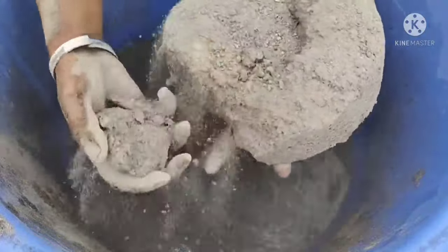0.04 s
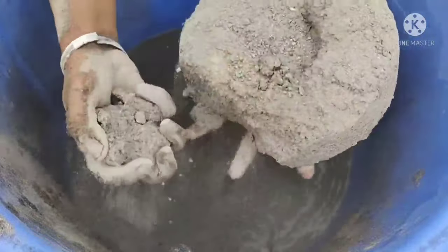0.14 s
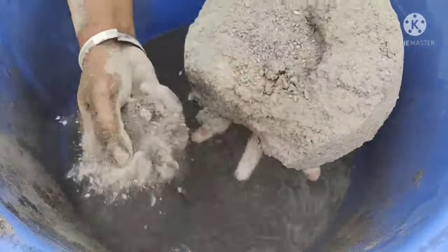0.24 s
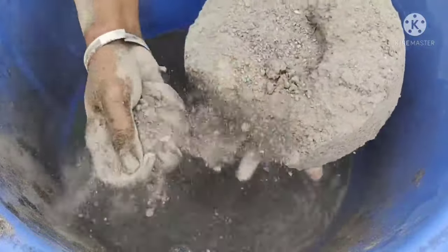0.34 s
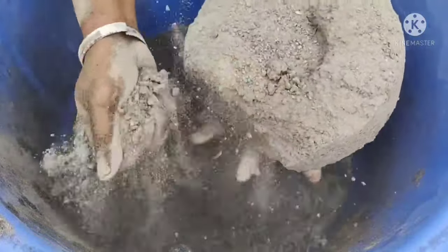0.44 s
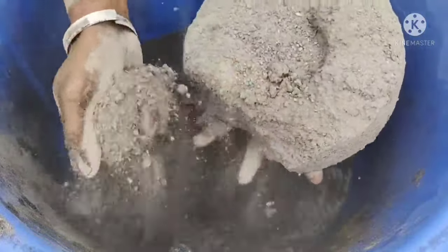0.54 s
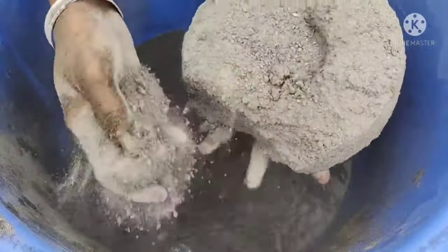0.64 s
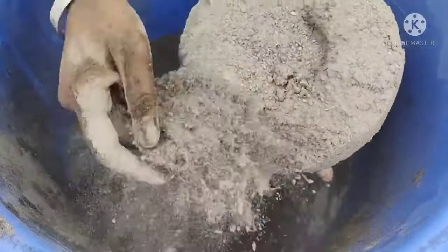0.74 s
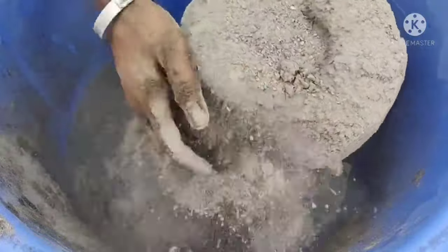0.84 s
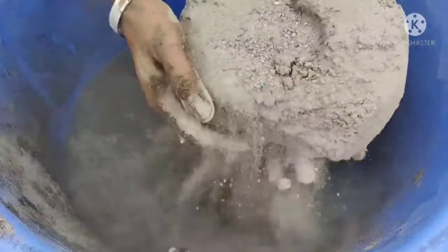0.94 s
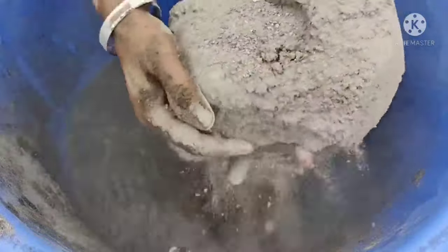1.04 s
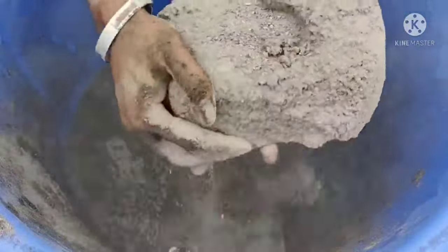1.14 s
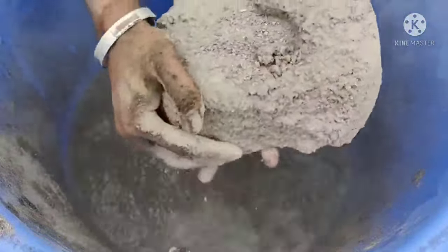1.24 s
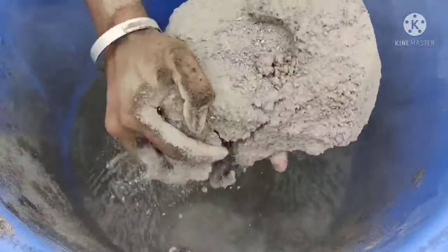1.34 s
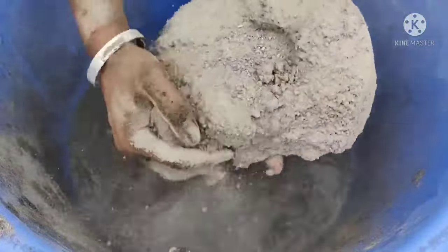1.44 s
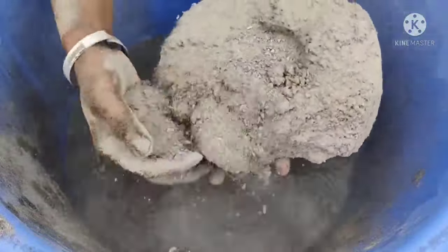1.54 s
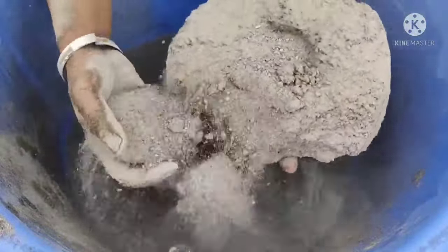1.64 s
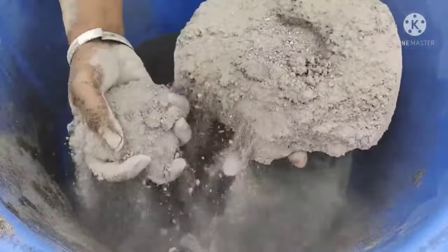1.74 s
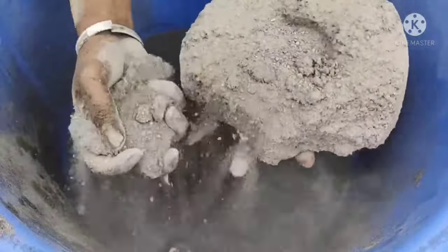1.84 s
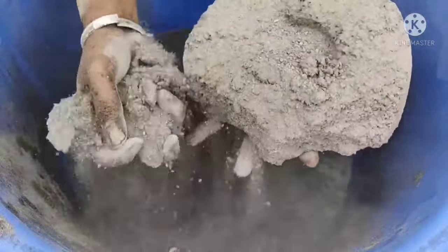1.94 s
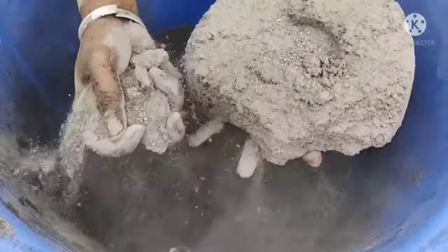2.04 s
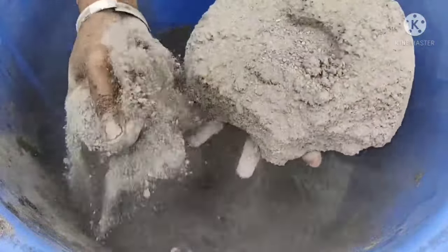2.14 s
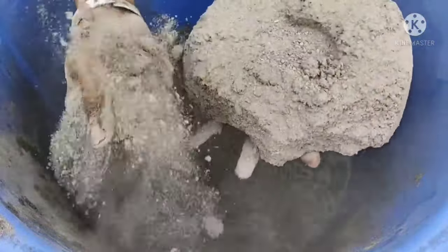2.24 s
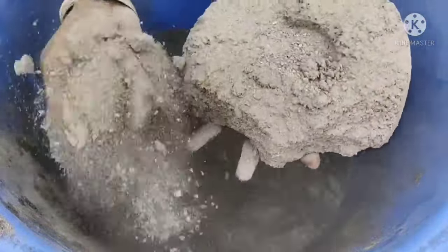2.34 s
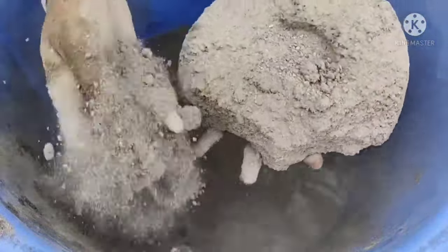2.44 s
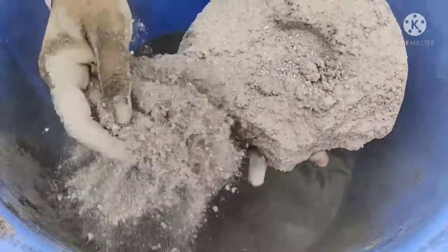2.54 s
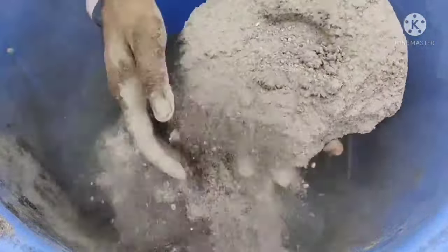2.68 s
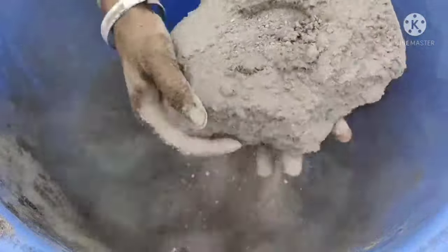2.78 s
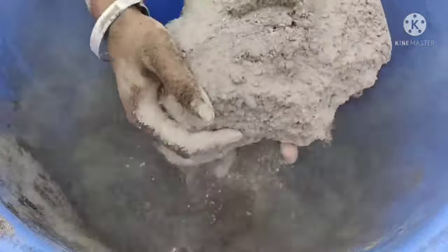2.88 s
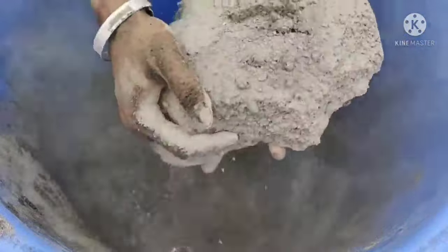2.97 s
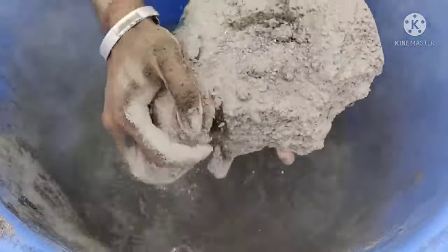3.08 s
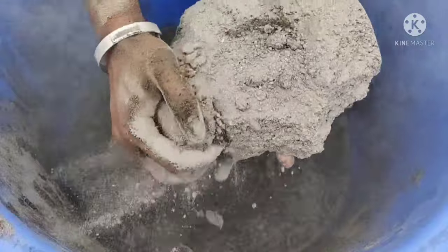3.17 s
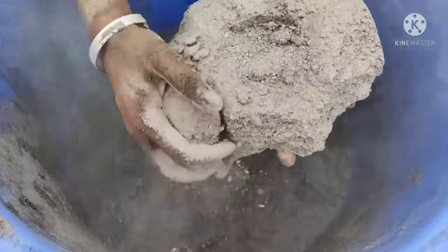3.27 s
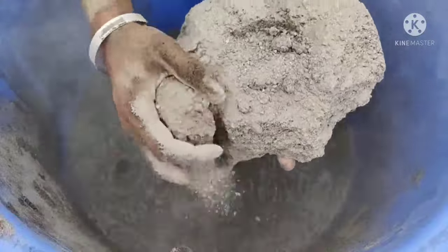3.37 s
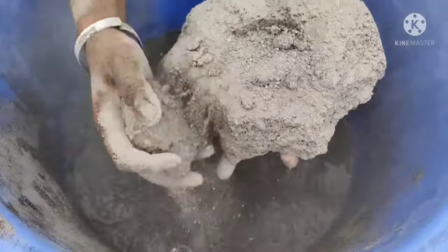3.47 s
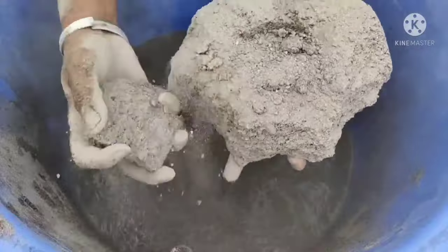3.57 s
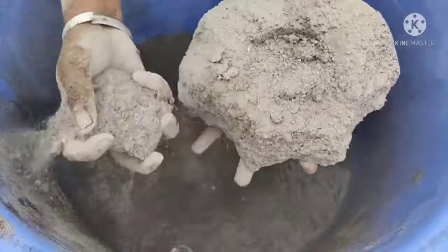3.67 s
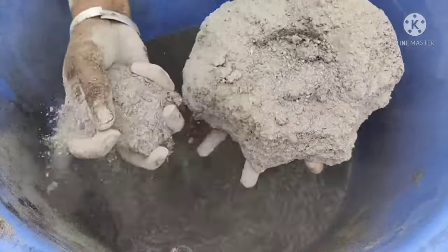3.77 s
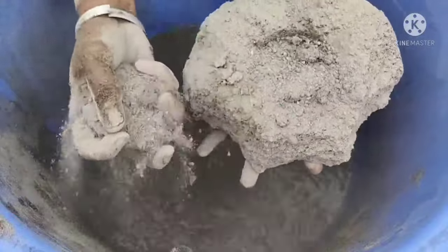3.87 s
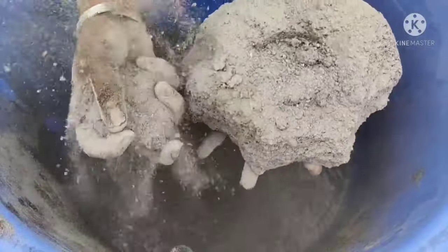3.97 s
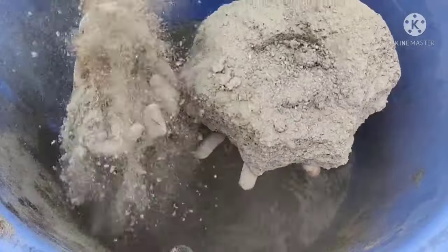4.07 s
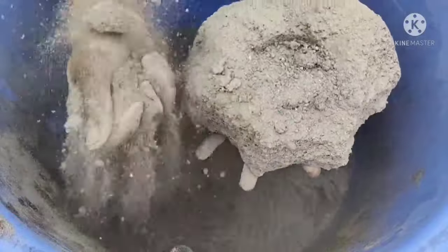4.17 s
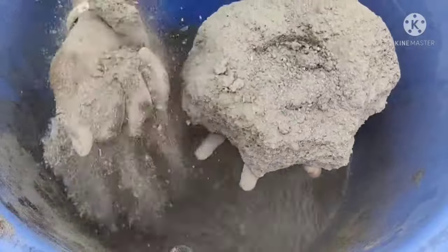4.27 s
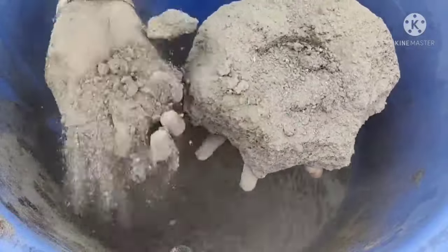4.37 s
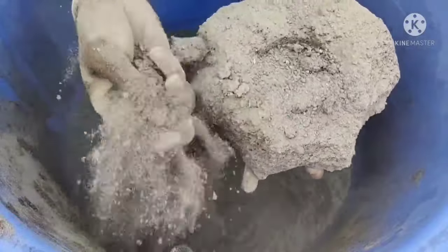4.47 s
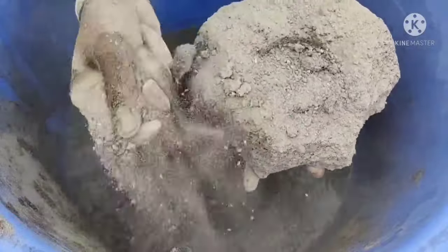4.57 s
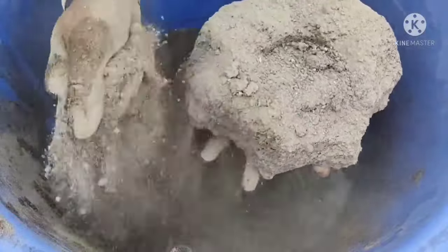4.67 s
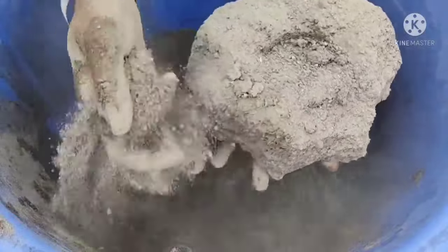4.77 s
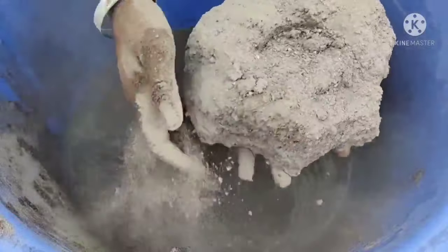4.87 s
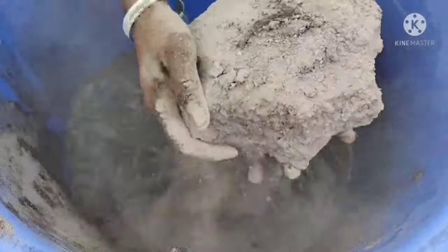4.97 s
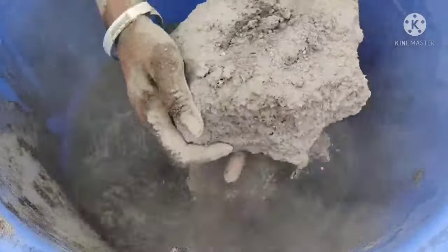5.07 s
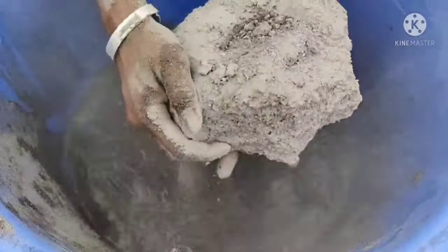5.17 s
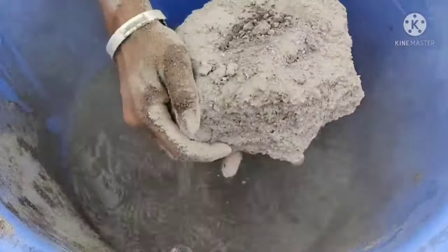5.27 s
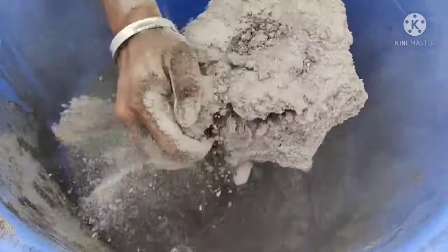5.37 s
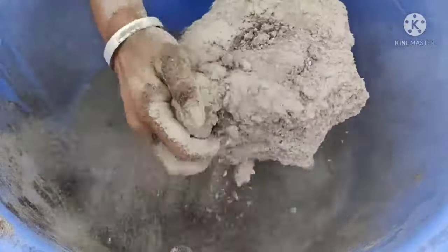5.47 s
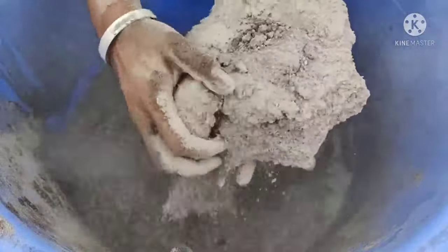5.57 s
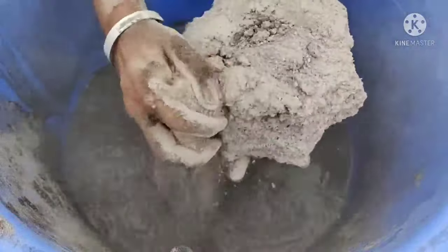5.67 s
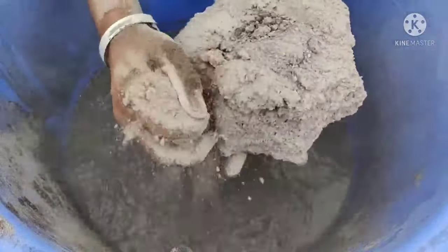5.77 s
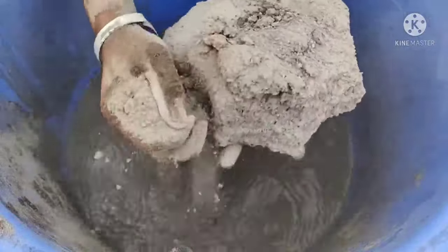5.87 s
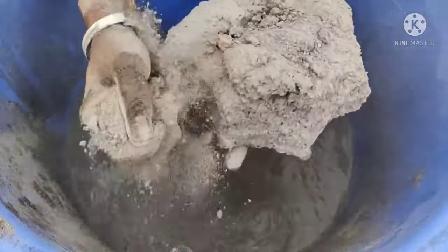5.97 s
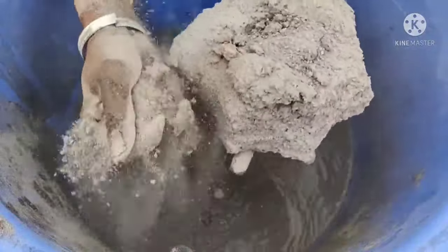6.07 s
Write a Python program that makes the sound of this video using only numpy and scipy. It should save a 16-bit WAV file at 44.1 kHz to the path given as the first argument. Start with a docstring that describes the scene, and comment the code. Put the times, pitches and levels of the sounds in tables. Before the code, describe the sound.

A hand crumbles a dry sand-cement block over a tub of water, gritty crunches and sharp cracks followed by fizzing, pattering crumbs and plopping lumps.

```python
"""Outdoors, close over a plastic tub of water, a hand crumbles a block of sand and cement.
Grit hisses and cracks: random impulses and noise bursts are filtered, and small resonators ring.
Crumbs fizz and patter as swarms of rising bubble tones; some single bubbles ping.
Larger lumps slap the surface, open ringing cavities and excite the damped modes of the tub.
A low rumble and buffeting air lie behind, as filtered noise."""
import sys
import numpy as np
from scipy import signal
from scipy.fft import rfft, irfft
from scipy.io import wavfile

SR = 44100
rng = np.random.default_rng(int(sys.argv[2]) if len(sys.argv) > 2 else 0)


def store_pcm(level_fs):
    """Save levels as 16-bit WAV."""
    pcm = np.round(np.clip(level_fs, -1, 1) * 32767).astype(np.int16)
    wavfile.write(sys.argv[1], SR, np.atleast_2d(pcm).T)


N = 269892  # length in samples

# Event levels are relative: each layer applies its own gain afterwards.
# Background air spectrum. Each row: frequency in Hz, relative level in dB.
AIR_SPECTRUM = [(20, -38), (50, -3), (70, -5), (105, -3), (150, -3), (220, 1.5), (290, -4), (400, -16),
                (700, -14), (2000, -48), (8000, -42)]
# Buffeting air spectrum. Each row: frequency in Hz, relative level in dB.
BUFFET_SPECTRUM = [(10, -30), (22, -12.0), (33, 11.5), (50, -6.5), (80, -27), (200, -9), (1000, -69)]
# Puffs of air at the microphone. Each row: start in seconds, hold in seconds, level in dB.
AIR_PUFFS = [(.7, 0.13, -36), (1.93, 0.093, -35.5), (2.24, 0.055, -44), (2.47, .08, -37), (5.35, .08, -35)]
# Spectrum of sand under the fingers. Each row: frequency in Hz, relative level in dB.
RUB_SPECTRUM = [(2000, -26), (4500, -15), (7200, 0), (10000, -15), (15000, -28)]
# Fingers shear sand off the block. Each row: start in seconds, hold in seconds, level in dB.
SQUEEZES = [(0.0, 0.024, -30), (.125, 0.034, -42), (.31, 0.045, -42.5), (.437, 0.0095, -27),
            (.495, 0.17, -37.5), (.65, 0.081, -39), (.92, 0.024, -34), (1.15, 0.069, -35),
            (1.3, 0.03, -38.5), (1.403, 0.012, -47), (1.517, 0.022, -33.5), (1.61, 0.097, -43.5),
            (1.8, 0.072, -37.5), (1.9, .04, -44), (2.04, 0.045, -41), (2.325, 0.055, -31.5),
            (2.48, 0.037, -34.5), (2.77, .12, -30.5), (2.97, .03, -33), (3.297, 0.037, -29.5),
            (3.44, 0.017, -34), (3.76, 0.16, -40), (3.93, 0.083, -37), (4.225, 0.011, -27),
            (4.345, 0.12, -37), (4.64, 0.14, -40), (4.76, .11, -34.5), (4.93, 0.2, -43),
            (5.135, 0.011, -32), (5.46, 0.01, -41), (5.537, 0.028, -28.5), (5.88, .055, -35.5),
            (5.96, 0.067, -43), (6.063, 0.025, -30.5)]
# Showers of crumbs on the water. Each row: start in seconds, hold in seconds, level of the fine crumbs
# in dB, level of the coarse crumbs over the fine ones in dB.
SHOWERS = [(0.0, 0.052, -31, 0), (0.089, 0.048, -34, 3), (0.238, 0.014, -35, 2.5),
           (0.296, 0.085, -37, -2.5), (0.432, 0.2, -42.5, 5.5), (0.663, 0.1, -34, -2),
           (0.801, 0.07, -32.5, -10), (0.905, 0.057, -32, 3), (0.989, .21, -31.5, -1.5),
           (1.223, 0.027, -40, 1.5), (1.39, 0.021, -42, 6), (1.52, 0.045, -43, 5), (1.609, 0.11, -38, 3),
           (1.883, 0.058, -30.5, -1.5), (1.968, 0.0098, -28.5, 10), (2.047, 0.024, -36.5, 4.5),
           (2.129, 0.03, -36, 4.5), (2.244, 0.033, -35, 8), (2.313, 0.16, -34, 0), (2.521, 0.054, -35, 6),
           (2.604, 0.052, -36, 7), (2.711, 0.045, -34, 3.5), (2.782, 0.22, -31, -1),
           (3.055, 0.048, -39, -1), (3.383, 0.073, -41, 2.5), (3.469, 0.021, -31.5, -6),
           (3.516, 0.19, -39.5, -10.5), (3.732, 0.027, -38, 0), (3.901, 0.043, -34.5, 1),
           (3.997, 0.067, -43.5, -1), (4.091, 0.018, -34.5, -1.5), (4.187, 0.098, -36, 0),
           (4.324, .17, -32, 1.5), (4.537, 0.047, -33.5, -1.5), (4.598, .025, -36, -7),
           (4.711, 0.038, -36.5, 3), (4.744, 0.06, -35.5, 6), (4.83, 0.217, -36, 0.5),
           (5.113, 0.06, -31, -4.5), (5.166, 0.13, -38.5, -1), (5.642, 0.033, -30.5, 4.5),
           (5.706, 0.086, -32.5, -7.5), (5.845, 0.082, -35, -1.5)]
# Spectrum of loose sand. Each row: frequency in Hz, relative level in dB.
SAND_SPECTRUM = [(300, -25), (1200, -3.5), (2500, -2), (4000, -11), (5200, -9), (6300, -1.5), (7200, 1.5),
                 (8300, -3), (10000, -14.5), (12500, -33.5), (15500, -27)]
# Spectrum of brittle fracture. Each row: frequency in Hz, relative level in dB.
CRACK_SPECTRUM = [(200, 5.5), (1000, 4), (3000, -4), (5000, 2.5), (7200, 10.5), (9000, -3.5),
                  (12000, -22.5), (15500, -29)]
# Spectrum of small splashes. Each row: frequency in Hz, relative level in dB.
SPLASH_SPECTRUM = [(40, -5), (150, 3.5), (270, 0.5), (500, -0.5), (650, 0), (920, 3.5), (1800, -20.5),
                   (4000, -9), (10000, -36)]
# Clearest single bubbles. Each row: start in seconds, level in dB, initial pitch in Hz.
BUBBLES = [(0.051, -23, 1360), (0.059, -24, 2360), (0.442, -24, 2660), (1.071, -23, 2340),
           (1.092, -19, 2800), (1.095, -20, 1960), (1.403, -24, 2060), (1.701, -21.5, 2380),
           (2.081, -18.5, 1725), (2.385, -21, 1620), (2.625, -18.5, 2360), (3.529, -27, 1800),
           (3.606, -22, 2010), (3.852, -22, 2110), (3.928, -21, 1970), (4.01, -22.5, 2140),
           (4.203, -20.5, 1830), (4.477, -31, 2100), (5.004, -19.5, 1590), (5.035, -17, 1990),
           (5.733, -24, 1450), (5.756, -18.5, 2680)]
# Sunken lumps landing on the bottom. Each row: start in seconds, level in dB.
THUDS = [(0.116, -18.5), (0.747, -32), (0.949, -32), (1.36, -22), (1.977, -14), (2.286, -8.5), (2.564, -36),
         (2.792, -27), (3.097, -18.5), (3.152, -23.5), (4.443, -20), (4.569, -22), (5.303, -21),
         (5.396, -18.5)]
# Modes of the tub with its water. Each row: frequency in Hz, relative level in dB, t60 in seconds.
TUB_MODES = [(105.7, -14.5, 0.36), (134.6, -10, 0.085), (180, -7, 0.077), (262, -3, 0.083),
             (316, -8, 0.047), (361, 2, 0.069), (450, 0.5, 0.024), (579, -4.5, 0.054), (753, -8.5, 0.052),
             (910, -2, 0.072), (1270, -12.5, 0.055), (1840, -3, 0.055)]
# Brittle cracks, strong and faint. Each row: start in seconds, level in dB, frequency in Hz of the short
# ring added to the crack.
SNAPS = [(0.0865, -10.5, 6400), (0.145, -2, 6440), (0.2611, -6, 7460), (0.266, -13, 7200),
         (0.5374, -15, 6660), (0.662, -10.5, 6500), (0.7107, -9.5, 6826), (0.7305, -10, 6400),
         (0.7436, 1, 6720), (0.8195, -14, 6169), (0.8528, -6.5, 6400), (0.8731, -9, 6470),
         (0.9617, -17, 6900), (1.1196, -10.5, 6330), (1.24, -15, 7700), (1.3454, -16, 7000),
         (1.7477, -10, 6940), (1.8, -17, 7100), (1.817, -16, 6000), (1.93, -7, 7760), (1.9324, -10.5, 3040),
         (1.9757, -4, 6550), (1.982, -3, 3350), (2.023, -9.5, 6800), (2.2793, -29, 3000),
         (2.4439, -6.5, 7230), (2.567, -3.5, 7360), (2.568, -17, 12400), (2.8197, -3.5, 6750),
         (2.821, -18, 13800), (3.0503, -8, 5500), (3.4789, -16.5, 8100), (3.553, -19, 12600),
         (3.6742, -15.5, 7100), (3.9015, -11, 2930), (4.0477, -13.5, 7740), (4.1044, -9.5, 7400),
         (4.345, -1.5, 6000), (4.3889, -5, 4900), (4.4384, -5, 8100), (4.4402, -13, 12300),
         (4.6086, -9.5, 6500), (5.0572, -10, 6850), (5.3016, -10, 7200), (5.6604, -8.5, 7550),
         (5.6737, -26, 3000), (5.9376, -12, 6200)]
# Lumps hitting the water. Each row: start in seconds, level of the cavity's ring in dB, its initial pitch
# in Hz, level of the knock on the tub in dB, level of the wet slap in dB.
LUMPS = [(0.106, -22.5, 634, -24, -15), (0.183, -18, 930, -19, -14.5), (0.26, -1.5, 827, -11.5, -5.5),
         (0.268, -8.5, 930, -16, -27), (0.355, -21, 850, -18, -36), (0.392, -14, 1015, -20, -33),
         (0.519, -19.5, 920, -42, -34), (0.687, -13.5, 987, -44, -34), (0.734, -19, 1040, -12.5, -18),
         (0.745, -32, 770, -9.5, -17), (0.817, -14.5, 865, -28.4, -20), (0.852, -13.5, 1040, -12.5, -12),
         (0.941, -27, 1110, -11.5, -9), (0.949, -34, 910, -16, -29), (0.97, -19, 970, -30, -30),
         (1.144, -18, 965, -40, -24), (1.154, -11.5, 917, -20, -28), (1.345, -13.5, 965, -12, -20),
         (1.747, -9.5, 850, -13, -9.5), (1.798, -20.5, 1530, -26, -15.5), (1.913, -14, 905, -20, -18),
         (1.974, -6, 905, -6, -7), (1.982, -24, 764, -10.5, -15), (1.985, -2.5, 784, -8.5, -17),
         (1.992, -26, 870, -11, -9), (2.002, -8, 840, -14, -35), (2.014, -4.5, 965, -13, -13),
         (2.023, -3, 840, -10.5, -10), (2.103, -16.5, 960, -23.5, -17), (2.258, -10, 610, -33, -3),
         (2.261, -10.5, 1070, -7.5, -11), (2.282, -0.3, 937, -7, -2.5), (2.446, -4, 918, -39, -6.5),
         (2.463, -9, 870, -19.5, -17.5), (2.567, -17, 573, -20.5, -27), (2.64, -13.5, 936, -27, -17),
         (2.695, -12.5, 936, -19.5, -31), (2.756, -13, 1010, -32, -12), (2.836, -17.5, 840, -31, -34),
         (2.913, -24, 1270, -23, -15), (3.003, -19, 1310, -23.5, -28), (3.174, -20.5, 1530, -29.5, -19),
         (3.495, -17, 1390, -30, -15), (3.903, -9, 970, -23.5, -8), (3.918, -13.5, 1120, -40, -24),
         (4.338, -11.5, 840, -35, -17), (4.428, -24, 1180, -17.5, -18), (4.434, -11, 1180, -13, -29),
         (4.565, -17.5, 830, -17, -18), (4.608, -21.5, 1220, -20, -9), (4.684, -17, 940, -43, -29),
         (4.923, -20, 910, -52, -9), (5.016, -13.5, 890, -45, -25), (5.302, -19, 1000, -22, -26),
         (5.34, -9, 810, -37, -17.5), (5.391, -17, 577, -25, -21.5), (5.675, -3.5, 1326, -30, -6),
         (5.678, -8, 984, -22, -11.5), (5.86, -17, 960, -41.5, -32)]
# Spectrum of the wet slap. Each row: frequency in Hz, relative level in dB.
SLAP_SPECTRUM = [(150, -9.5), (500, 1.5), (1100, 2.0), (2100, 0.5), (4500, -12.5), (12000, -29.5)]

AIR_DB, DRAUGHT_DB = -39.5, -48.5  # rumble, and the steady floor of the buffeting
PUFF_ATTACK_S, PUFF_T60_S = .05, 1
SQUEEZE_ATTACK_S, SQUEEZE_T60_S = 0.0033, 0.11
SHOWER_ATTACK_S, SHOWER_T60_S = 0.0089, 0.16
STRAGGLER_DB, STRAGGLER_T60_S = -11, 0.82  # late crumbs, relative to their shower
TAIL_PER_HOLD = 1.1  # seconds of extra t60 per second held: a long pour thins out slowly
SHOWER_SAND_DB = -0.5  # loose sand that comes down with a shower
TRICKLE_SAND_DB, TRICKLE_FINE_DB, TRICKLE_COARSE_DB = -45.5, -55, -65  # steady flow between handfuls
CLUMPS_PER_S, CLUMPING_DB = 45, 1.5  # gain points per second and their standard deviation
CRACKLE_FOLLOWS = .6  # exponent on the flow: crackle level varies less than the sand's
RUB_DB = -46
TOP_HZ = 15700  # upper edge of the recorded band


def undb(db):
    """Logarithmic level: 20 dB is a factor of ten in amplitude."""
    return 10 ** (np.asarray(db) / 20)


def unit(x):
    """Normalisation by mean power: rms becomes 1."""
    return x / np.sqrt(np.mean(x ** 2))


def peak(x):
    """Normalisation by the largest excursion: peak becomes 1."""
    return x / np.abs(x).max()


def clock(length):
    """Uniform sampling: the sample times of a short sound."""
    return np.arange(int(length * SR)) / SR


def fade(t, t60):
    """Exponential damping: amplitude falls by 60 dB in t60 seconds."""
    return np.exp(-np.log(1000) * t / t60)


def add(out, s, x):
    """Superposition: mix x into out at s seconds."""
    i = min(max(int(s * SR), 0), N)
    out[i:i + len(x)] += x[:N - i]


def colour(x, points, size=1024):
    """Minimum-phase filtering: folding the cepstrum makes a (Hz, dB) response causal."""
    hz, db = np.transpose(points)
    f = np.maximum(np.arange(size // 2 + 1) * SR / size, 1)
    response_db = np.interp(np.log(f), np.log(hz), db)
    cepstrum = irfft(np.log(undb(response_db)))
    cepstrum[1:size // 2] *= 2
    cepstrum[size // 2 + 1:] = 0
    impulse_response = irfft(np.exp(rfft(cepstrum)))
    return signal.fftconvolve(x, impulse_response)[:len(x)]


def highpass(x, hz):
    """Third-order Butterworth filtering: a steep cut of the lows."""
    return signal.sosfilt(signal.butter(3, hz, "high", fs=SR, output="sos"), x)


def ring(hz, t60, glide):
    """Damped resonance: it swells within a cycle and dies as its pitch rises by the share glide."""
    t = clock(t60)
    tone = np.sin(2 * np.pi * hz * (t + glide * t ** 2 / (2 * t60)))
    return tone * fade(t, t60) * (1 - np.exp(-3 * hz * t))


def grains(per_s, spread_db):
    """Shot noise: random impulses, many small and a few large."""
    chance = rng.random(N)
    size = np.minimum(rng.exponential(size=N), 4)
    sign = rng.choice([-1, 1], N)
    return unit((chance < per_s / SR) * sign * undb(spread_db * size))


def swarm(flow, low_hz, high_hz, cycles, glide, spread_db, thinning, count):
    """Superposed random resonators: a weak flow excites fewer, so they stand apart."""
    out = np.zeros(N)
    density = np.minimum(flow / np.percentile(flow, 90), 1) ** thinning
    for when, pitch, size, life, luck in rng.random((count, 5)):
        hz = low_hz * (high_hz / low_hz) ** pitch
        if luck < density[int(when * N)]:
            level = undb(spread_db * size ** 2)
            add(out, when * N / SR, level * ring(hz, cycles * (.5 + life) / hz, glide))
    # undo the mean loss of power through thinning, so that flow sets the level
    return flow * unit(out / np.sqrt(density))


def power(rows, attack_s, t60):
    """Incoherent addition: powers of gestures sum as each rises, holds and dies away."""
    out = np.zeros(N)
    for s, length, db in rows:
        tail = t60 + TAIL_PER_HOLD * length
        t = clock(length + tail)
        rise = np.minimum(t / attack_s, 1)
        decay = fade(np.maximum(t - length, 0), tail)
        add(out, s, (undb(db) * rise * decay) ** 2)
    return out


def clumps():
    """Random modulation: the gain wanders as crumbs bunch and thin."""
    knots = rng.standard_normal(N // 100)  # more than are used
    position = np.arange(N) / SR * CLUMPS_PER_S
    return undb(CLUMPING_DB * np.interp(position, np.arange(len(knots)), knots))


def background():
    """Broadband noise in moving air: a low outdoor rumble, and puffs that buffet the microphone."""
    rumble = undb(AIR_DB) * unit(colour(rng.standard_normal(N), AIR_SPECTRUM, size=8192))
    buffet = unit(colour(rng.standard_normal(N), BUFFET_SPECTRUM, size=16384))
    puff_power = power(AIR_PUFFS, PUFF_ATTACK_S, PUFF_T60_S)
    return rumble + buffet * np.sqrt(undb(DRAUGHT_DB) ** 2 + puff_power)


def rubbing():
    """Granular friction: a faint, high, uneven rustle of sand under the fingers."""
    return undb(RUB_DB) * clumps() * unit(colour(grains(per_s=2300, spread_db=6), RUB_SPECTRUM))


def falling(rows):
    """Dispersion of arrivals: the bulk of a shower lands at once and weaker stragglers die away later."""
    bulk = power(rows, SHOWER_ATTACK_S, SHOWER_T60_S)
    stragglers = power(rows, SHOWER_ATTACK_S, STRAGGLER_T60_S)
    return bulk + undb(STRAGGLER_DB) ** 2 * stragglers


def flows():
    """Source strength as root power: dry sand, fine and coarse crumbs from squeezes, showers and trickle."""
    fine = falling([(s, length, db) for s, length, db, _ in SHOWERS])
    coarse = falling([(s, length, db + coarse_db) for s, length, db, coarse_db in SHOWERS])
    squeezed = power(SQUEEZES, SQUEEZE_ATTACK_S, SQUEEZE_T60_S)
    sand = squeezed + undb(SHOWER_SAND_DB) ** 2 * (fine + coarse) / 2
    return (np.sqrt(sand + undb(TRICKLE_SAND_DB) ** 2),
            np.sqrt(fine + undb(TRICKLE_FINE_DB) ** 2) * clumps(),
            np.sqrt(coarse + undb(TRICKLE_COARSE_DB) ** 2) * clumps())


def breaking_sand(sand, hiss_db, grit_db, puff_t60, tick_db, crackle_db):
    """Granular fracture: freed sand hisses, bursts in short puffs, ticks and crackles."""
    hiss = sand * unit(colour(grains(per_s=7000, spread_db=4.0), SAND_SPECTRUM))
    # each crumb bursts into a puff of sand that starts sharply and dies within milliseconds
    bursts = np.abs(grains(per_s=400, spread_db=4))
    puffs = signal.fftconvolve(bursts, fade(clock(puff_t60), puff_t60))[:N]
    grit = sand * unit(colour(puffs * rng.standard_normal(N), SAND_SPECTRUM))
    ticks = swarm(sand, low_hz=4660, high_hz=8300, cycles=10, glide=0,
                  spread_db=18, thinning=1.0, count=2800)
    crackle_flow = sand.mean() * (sand / sand.mean()) ** CRACKLE_FOLLOWS
    crackle = crackle_flow * unit(colour(grains(per_s=70, spread_db=3), CRACK_SPECTRUM))
    return (undb(hiss_db) * hiss + undb(grit_db) * grit
            + undb(tick_db) * ticks + undb(crackle_db) * crackle)


def crumbs_on_water(fine, coarse, fizz_db, ping_db, patter_db, splash_db):
    """Bubble resonance: small crumbs trap small, high bubbles; coarse ones trap lower ones and splash."""
    fizz = swarm(fine, low_hz=1564, high_hz=4420, cycles=20.4, glide=0.29,
                 spread_db=14.0, thinning=0.88, count=3800)
    pings = swarm(fine, low_hz=1362, high_hz=3070, cycles=75, glide=0.13,
                  spread_db=3, thinning=0.24, count=130)
    patter = swarm(coarse, low_hz=837, high_hz=1916, cycles=39, glide=0.34,
                   spread_db=18, thinning=0.67, count=1500)
    splash = coarse * unit(colour(grains(per_s=900, spread_db=3.5), SPLASH_SPECTRUM))
    return (undb(fizz_db) * fizz + undb(ping_db) * pings
            + undb(patter_db) * patter + undb(splash_db) * splash)


def bubbles(gain_db, cycles):
    """Bubble resonance near the surface: bubbles left by single crumbs ping with a rising pitch."""
    out = np.zeros(N)
    for s, db, hz in BUBBLES:
        add(out, s, undb(db + gain_db) * ring(hz, cycles / hz, glide=0.035))
    return out


def tub(contact_s, scatter_db):
    """Modal excitation: a longer contact favours low modes; each spot stirs them differently."""
    t = clock(.2)
    chance = rng.standard_normal((len(TUB_MODES), 3))
    modes = np.zeros(len(t))
    for (hz, db, t60), (level, detune, side) in zip(TUB_MODES, chance):
        tone = np.sin(2 * np.pi * hz * (1 + 0.0078 * detune) * t) * fade(t, t60)
        modes += np.sign(side) * undb(db + scatter_db * level) * tone
    push = np.hanning(int(contact_s * SR) + 3)
    # little radiates below the lowest mode
    return peak(highpass(signal.fftconvolve(modes, push), hz=85.5))


def thuds(gain_db, contact_s):
    """Cushioned impact: water softens the landing of sunken lumps, so the bottom only booms."""
    out = np.zeros(N)
    for s, db in THUDS:
        add(out, s, undb(db + gain_db) * tub(contact_s, scatter_db=2))
    return out


def snaps(crack_db, crack_t60, ring_db, ring_t60, strain_db, strain_t60):
    """Brittle fracture: tiny fractures gather, the bond bursts, and a short ring is added to the crack."""
    out, lead = np.zeros(N), .01  # seconds of gathering fractures before the burst
    t = clock(3 * lead) - lead
    gathering = undb(strain_db) * fade(np.abs(t), strain_t60)
    shape = np.where(t < 0, gathering, fade(np.abs(t), crack_t60))
    for s, db, hz in SNAPS:
        crack = colour(rng.standard_normal(len(t)) * shape, CRACK_SPECTRUM)
        add(out, s - lead, undb(db + crack_db) * peak(crack))
        add(out, s, undb(db + ring_db) * ring(hz, ring_t60, glide=0))
    return out


def plops(ring_db, ring_t60, knock_db, contact_s, slap_db, slap_t60):
    """Water entry: each lump slaps the surface, opens a briefly ringing cavity and knocks the tub."""
    out, t = np.zeros(N), clock(.05)
    for s, cavity_db, hz, tub_db, wet_db in LUMPS:
        slap = colour(rng.standard_normal(len(t)) * fade(t, slap_t60), SLAP_SPECTRUM)
        add(out, s, undb(cavity_db + ring_db) * ring(hz, ring_t60, glide=0.017))
        add(out, s, undb(wet_db + slap_db) * peak(slap))
        add(out, s, undb(tub_db + knock_db) * tub(contact_s, scatter_db=2))
    return out


def walls(x, wet_db, t60, size=2048):
    """Early reflection: dense decaying echoes inside the tub, drawn anew for each block of size samples."""
    t, out = clock(.06), x.copy()
    for i in range(0, N, size):
        echoes = rng.standard_normal(len(t)) * fade(t, t60) * (t > .002)
        reflected = signal.fftconvolve(x[i:i + size], echoes / np.linalg.norm(echoes))
        add(out, i / SR, undb(wet_db) * reflected)
    return out


def scene():
    """Superposition of sources: sand, crumbs, cracks and plops within the tub, over the background."""
    sand, fine, coarse = flows()
    near = rubbing()
    near += breaking_sand(sand, hiss_db=-3.0, grit_db=-1.0, puff_t60=0.015, tick_db=-5, crackle_db=-11)
    near += crumbs_on_water(fine, coarse, fizz_db=-1.0, ping_db=-17.5, patter_db=-4.0, splash_db=-4.0)
    near += bubbles(gain_db=2, cycles=46.0)
    near += snaps(crack_db=-1.5, crack_t60=0.0047, ring_db=4.0, ring_t60=0.0024,
                  strain_db=-12.0, strain_t60=0.01)
    near += plops(ring_db=2.5, ring_t60=0.024, knock_db=1, contact_s=0.0007, slap_db=-1.5, slap_t60=0.021)
    in_tub = walls(near, wet_db=-12.5, t60=0.031)
    return (background() + thuds(gain_db=-6, contact_s=0.0104) + in_tub)[None]


def record(dry):
    """Overload and band limiting: peaks flatten at full scale, then an elliptic filter cuts the top."""
    overloaded = np.clip(dry, -1, 1)
    return signal.sosfilt(signal.ellip(10, .2, 90, TOP_HZ, fs=SR, output="sos"), overloaded)


dry = scene()
out = record(dry)
store_pcm(out)
```